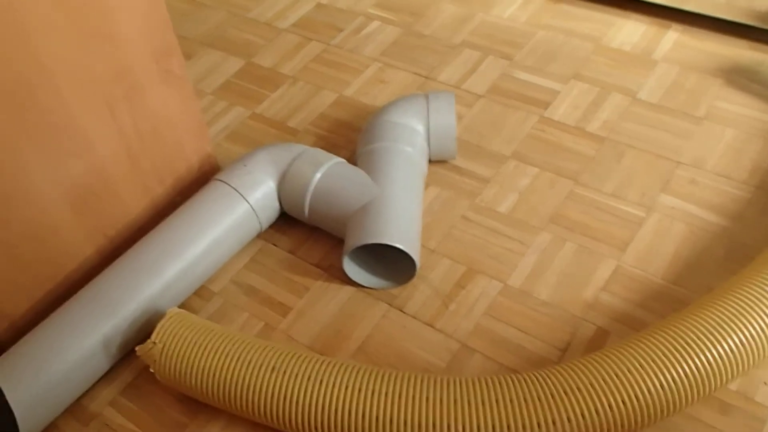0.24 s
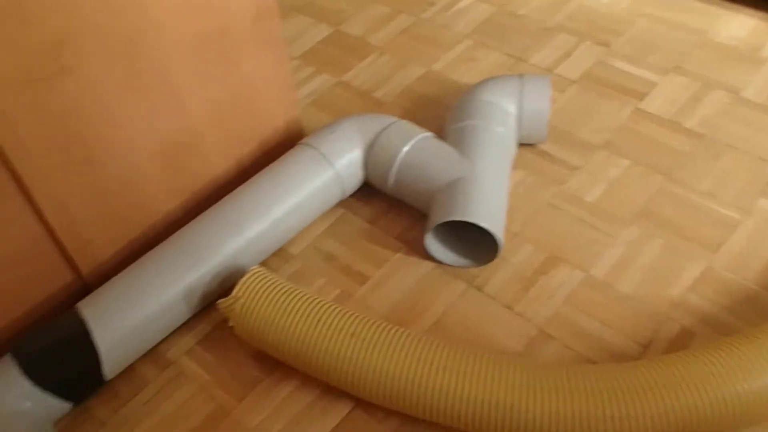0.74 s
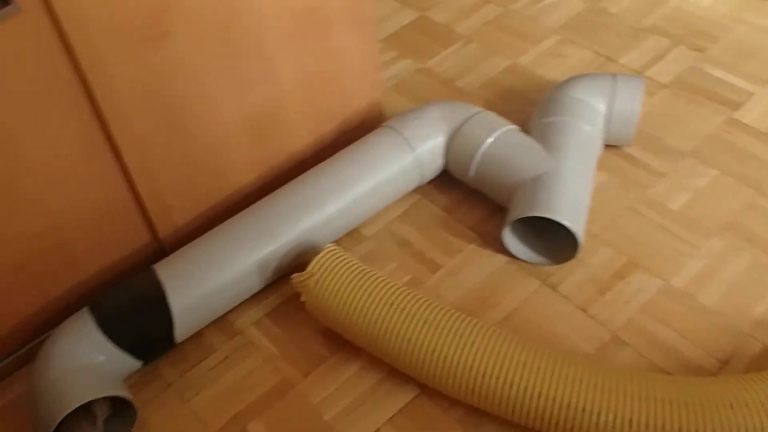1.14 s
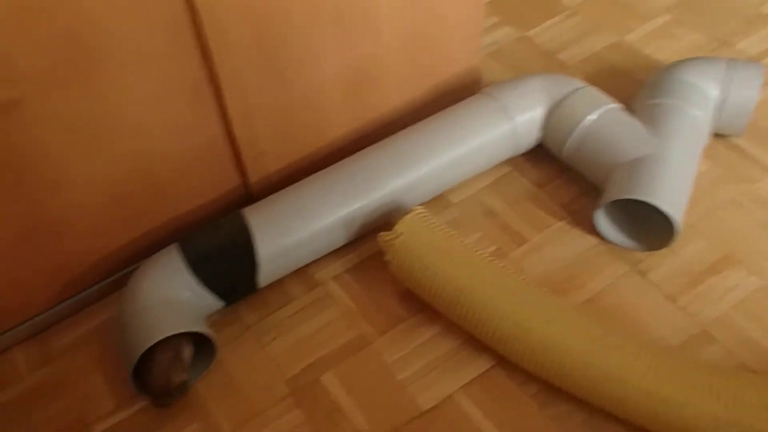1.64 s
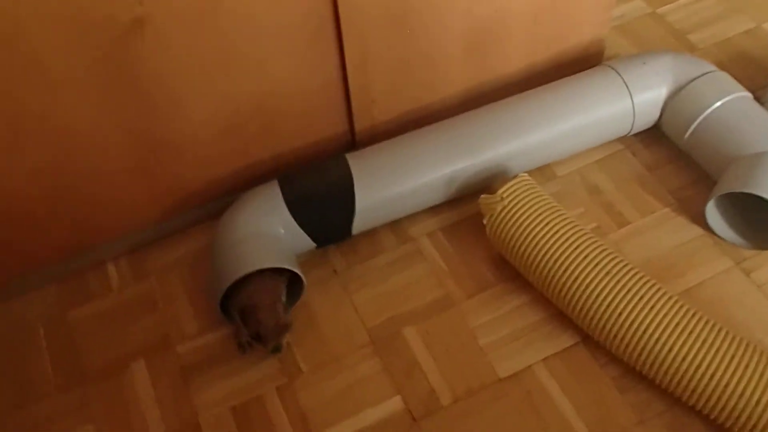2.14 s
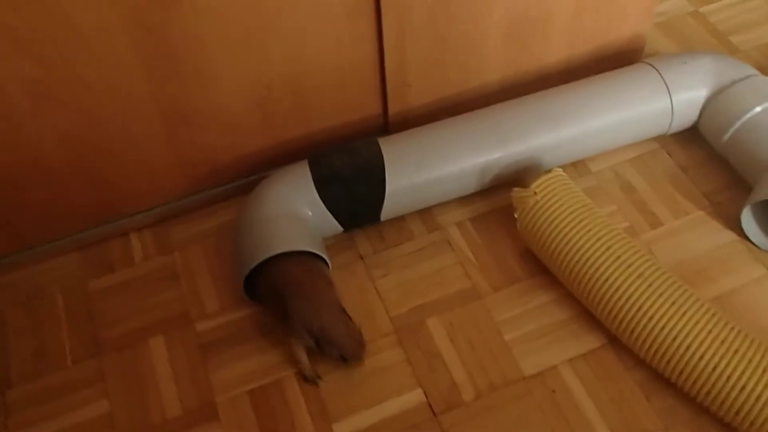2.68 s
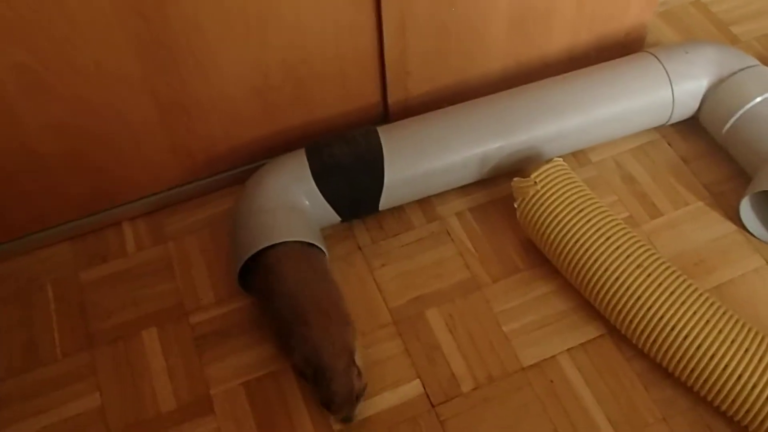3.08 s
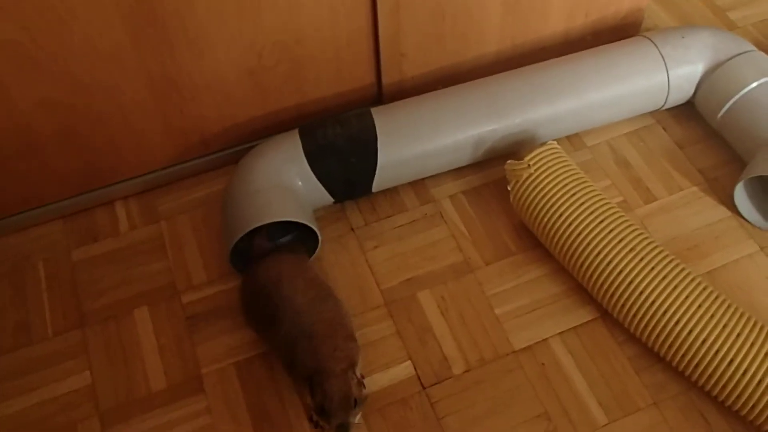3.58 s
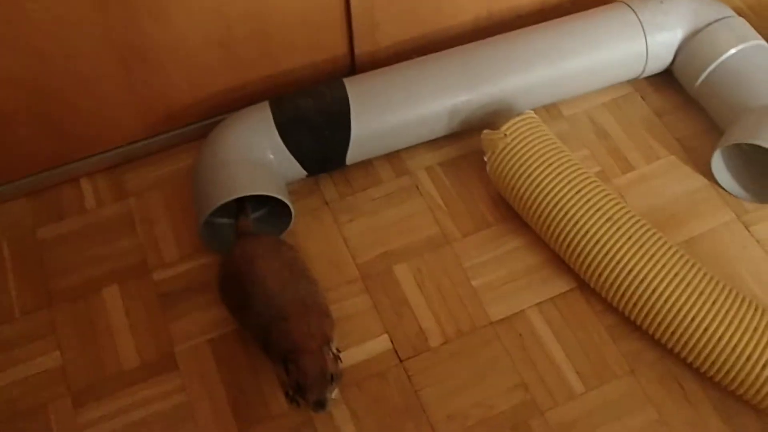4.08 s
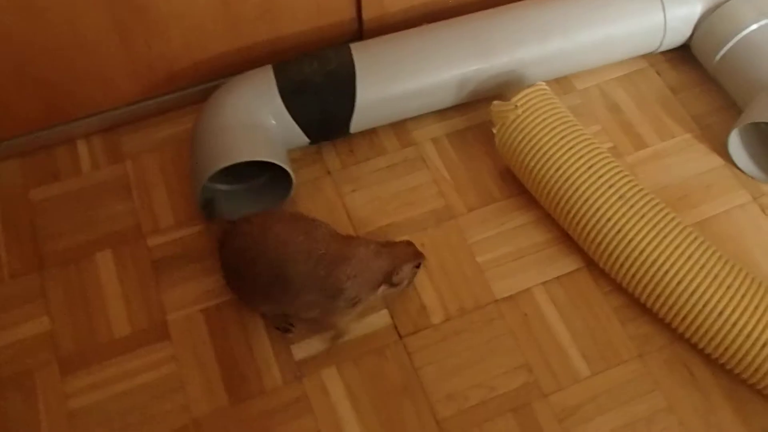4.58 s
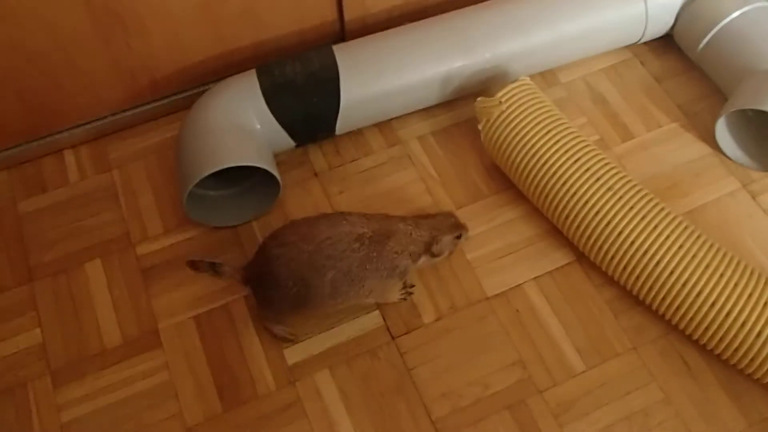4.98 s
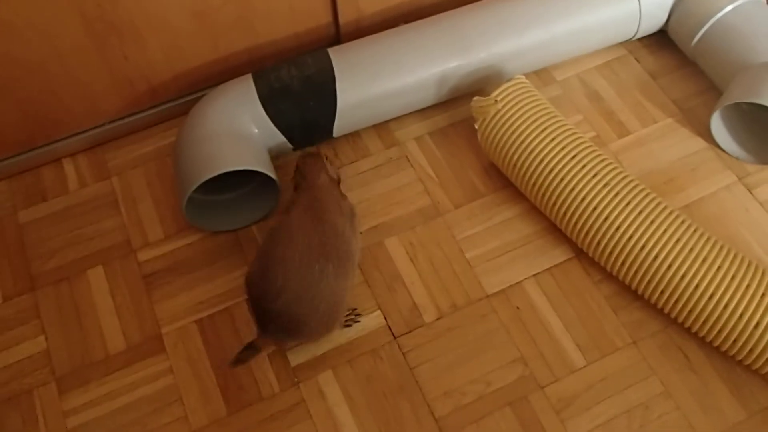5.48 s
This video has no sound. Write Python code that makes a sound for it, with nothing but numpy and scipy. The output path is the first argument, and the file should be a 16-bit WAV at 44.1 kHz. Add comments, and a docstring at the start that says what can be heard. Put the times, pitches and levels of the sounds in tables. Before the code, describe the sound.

Close, quick claw scratching rings thin and high in a plastic pipe for half a second, then breaks into sparse clicks and light scrapes. Sharper claw snaps come around three and four seconds, followed by a loud, short wooden knock before five. A quiet small room, handheld microphone with steady hiss, faint hum and soft handling bumps.

```python
"""On a parquet floor in a quiet room, a small rodent creeps out of a plastic drain pipe near a hand-held camera.
Its claws drag (dense runs of tiny slips) and click (short noise bursts), ringing plastic and wood.
A soft and later a loud knock on the floor combine a short pop with dying tones.
The hand rumbles, rubs and bumps the camera body; the electronics hiss, hum, pip and tick with every picture.
"""
import sys
import numpy as np
from scipy import signal
from scipy.fft import rfft, irfft, next_fast_len
from scipy.io import wavfile

SR = 44100
rng = np.random.default_rng(int(sys.argv[2]) if len(sys.argv) > 2 else 0)


def waveform_to_disk(signal):
    """Save audio, clipped to [-1, 1], as 16-bit WAV at the path in sys.argv[1]."""
    frames = np.transpose(np.atleast_2d(signal))
    scaled = np.clip(frames, -1, 1) * 32767
    samples = np.round(scaled).astype(np.int16)
    wavfile.write(sys.argv[1], SR, samples)


N = 252252   # length of the scene in samples

# claw strokes, each swelling and dying away:
# (peak time [s], rise [s], fall [s], pipe ring level [dB],
#  then relative to the pipe ring: pipe wall [dB], claw tips [dB], boards [dB], board thud [dB])
CLAW_STROKES = [(0.002, 0.018, 0.052, -40.5, -5.5, -8.5, -8, -19),
                (0.12, 0.077, .1, -42.5, -13, -26, -7, -15),
                (0.158, 0.057, 0.039, -38.5, -4, -11, -12, -28),
                (0.206, .03, 0.033, -42.5, -9, -17, -12, -20), (0.33, 0.35, .1, -53.5, -4, -9, -5.5, -11),
                (0.385, 0.036, 0.095, -40, -3.5, -13, -8, -13),
                (0.462, 0.044, 0.074, -47, -8, -14, -3.5, -11), (0.534, .03, 0.51, -59.5, -0.5, -7, -3, -7),
                (0.767, 0.015, .05, -55.5, -11, -22, -6, 2.5), (0.821, 0.082, 0.12, -45, -2, -7.5, -2, -10),
                (1.03, .05, .2, -62.5, 1, -2, -9, -4), (1.14, 0.17, 0.11, -56, -2, -12, 0, -6),
                (1.175, 0.012, 0.1, -46.5, 2, -3, -2, -18), (1.277, 0.051, .03, -50, -1, -5, -9, -4),
                (1.295, .02, .25, -60.5, 0, -4, -6, -12), (1.784, .09, .09, -57.5, -3, -2, -8, -10),
                (1.9, .1, .1, -62, 3, -14, -1, -9), (1.942, 0.093, 0.059, -48.5, -0.5, -20, 4, -4.5),
                (1.979, 0.047, 0.092, -47, -5, -21, -2.5, -1), (2.052, .01, 0.091, -57, 7.5, 7, -6, -8),
                (2.17, 0.016, 0.098, -62, 1, -10, 2, -5), (2.266, .1, 0.17, -58.5, 3, -3, -0.5, -1.5),
                (2.584, 0.23, .07, -67, -5, -4, 1, -6), (2.652, 0.042, 0.14, -57.5, 3.5, -8, 0, -14),
                (3.03, 0.029, .04, -63.5, -16, -13, 1, 8.5), (3.116, 0.076, 0.025, -51, 5, -4, 2, -9),
                (3.135, 0.0073, .025, -44.5, 0, 3, -5, -10), (3.154, .02, 0.11, -56, 3, 9.5, -2, -5),
                (3.436, .03, .16, -58.5, -15, -2, -6, -9), (3.562, 0.031, .08, -53.5, -12, -15, -7, -12),
                (3.6, 0.048, 0.17, -60, 6.5, 2, -3, -9), (3.733, 0.041, 0.16, -45, 0.5, 3.5, -5, -17),
                (3.901, 0.013, 0.15, -36.5, 1, 6.5, -2.5, -15.5),
                (3.934, 0.037, .1, -36, -6, 1.5, -17, -15), (4.02, 0.057, 0.42, -57, -6, -3, -9, -8),
                (4.128, .035, 0.083, -57, -7, -2, -6, -15), (4.153, .006, 0.17, -58.5, 6, 13.5, 0.5, -4.5),
                (4.312, 0.074, 0.18, -53, 0, -3.5, -6.5, -10), (4.44, 0.008, 0.051, -68, -2, 0, -4, 20),
                (4.486, .1, .12, -62.5, 0, -2, -7, -10), (4.56, 0.11, .12, -58, -11, -12, -6, -4),
                (4.65, 0.19, .1, -62, 1, 1, -10, -14), (4.723, 0.023, 0.15, -51.5, 5, 1.5, -3.5, -7),
                (4.899, .04, 0.08, -56.5, -2, -6, -9, -20), (4.935, .04, 0.19, -66.5, 8, 2, 3, -8),
                (5.27, .05, .1, -63, -5, 2, -12, -6), (5.314, 0.028, 0.056, -55.5, 7.5, -3, 0, -13),
                (5.517, 0.0079, .15, -56.5, -2, -3, -5.5, -6)]
# claw clicks: (time [s], pipe ring level [dB],
#  then relative to the pipe ring: pipe wall [dB], claw tips [dB], boards [dB])
CLAW_CLICKS = [(0.1, -38, -8, -16, -12), (0.2059, -38, -15, -19, -18), (0.268, -37, -1, -17, -6),
               (0.3708, -35, -2, -7, -9), (0.4322, -39, -2, -3, -8), (0.7653, -37.5, -6, -16, 1.5),
               (0.7846, -44, -5, -3, 3), (0.8274, -33, -5, -13, -9), (0.887, -44.5, 15, 7.5, -1),
               (1.0141, -50.5, -1, 8.5, -1), (1.049, -40.5, 2, -4, -8), (1.08, -48, 0, -6, -9),
               (1.102, -45, 1, -7, -7), (1.113, -50, 4, -6, -6), (1.121, -41, 0, -11, -6),
               (1.136, -50, 4, -6, -4), (1.1486, -47, 5, -4, -5), (1.175, -40, 8, -3, -17),
               (1.272, -32, 4, -12, -8), (1.3438, -43, -7, -8, -8), (1.7852, -40.5, 1, -7, -1.5),
               (1.8584, -49, -1, -4, 2), (1.882, -51, -3, -9, -3), (1.9013, -37, -6, -14, 2),
               (1.9364, -38, -2, -16, -5), (1.9735, -37, 2, -15, 5), (1.98, -43, 3, -15, -5),
               (1.991, -33.5, 1, -17, 1), (2.007, -36, 1, -15, -7), (2.0487, -42.5, 10, 11.5, -11),
               (2.172, -53, 7, 1, 8), (2.2002, -48, 15, 2, -13), (2.2706, -43.5, 5, -2, -3),
               (2.6477, -47.5, 6, -5, -1), (3.0205, -46, -11, -10, 5), (3.079, -41.5, 3, -6, -4),
               (3.129, -27.5, 1, 5, -4), (3.1307, -27, -4, 2, -6), (3.5149, -52, 5, 9, -1),
               (3.5608, -37.5, -11, -18, -12), (3.714, -36, -11, -3, -4), (3.891, -34, -2, 7, 3),
               (3.8943, -25, -14, 7.5, -18), (4.15, -50, -6, 12, -6), (4.712, -46, -4, 2, 6),
               (4.9365, -50, 9, -1, -9), (5.309, -44.5, -3, 1, -2), (5.319, -50, 1, 2, -4)]
# five ringing bodies, one table each: (pitch [Hz], nominal width [Hz], relative level [dB])
PIPE_RING = [(3736, 41, 2.5), (3812, 46, 3.5), (3878, 61, 2), (4020, 65, 4), (4126, 51, 1), (4115, 31, 1.5),
             (4273, 276, -2.5)]
PIPE_WALL_RING = [(4677, 215, 4), (4990, 290, -0.5), (5590, 330, -1.5), (6100, 200, 3.5),
                  (6460, 1800, -4.5)]
CLAW_TIP_RING = [(6950, 200, -8), (7400, 80, -12), (8050, 200, -6), (9400, 150, 0), (10050, 250, -4),
                 (10600, 150, -1), (10950, 200, 0), (11500, 250, -5), (12050, 300, -4), (13300, 600, -12),
                 (14700, 900, -19)]
BOARD_RING = [(2450, 250, -7), (2890, 60, 2), (3150, 200, -6), (3480, 100, -2)]
BOARD_THUD_RING = [(980, 564, -0.67), (1620, 440, 1.3), (1970, 640, -0.97)]
# how long a stroke dies away in each of the five bodies: (share of the stroke's fall time)
FALL_SHARES = [0.87, 0.75, 0.64, 0.9, 1.17]
# strength of the hiss along the pitch range: (pitch [Hz], relative level [dB per Hz])
HISS_SHAPE = [(18, -37), (30, -7.5), (70, -7.5), (90, -24), (121, -2.5), (145, -8), (215, -7.5),
              (437, -6.5), (780, -5), (844, -5.5), (2290, -8.5), (3870, -15), (6210, -10.5), (14400, -10.5),
              (16000, -11)]
# short dull pips from the camera: (time [s], relative level [dB])
CAMERA_PIPS = [(0.175, -52), (0.311, -47), (0.445, -50), (0.578, -45), (0.661, -41), (4.982, -47),
               (5.116, -49), (5.25, -45.5), (5.316, -50), (5.384, -49), (5.512, -51), (5.648, -54)]
# bumps on the camera body:
# (time [s], relative thud level [dB], thud pitch [Hz], shell ring relative to that level [dB])
CAMERA_BUMPS = [(0.234, -43.5, 148, -3), (1.009, -56, 56.5, -6), (1.089, -49, 147, -12),
                (1.609, -40.5, 101, -12), (1.659, -52, 126, -4), (1.79, -59, 127, 9.5),
                (2.244, -45.5, 129, -6), (2.315, -42.5, 77, -14.5), (2.482, -48.5, 86.1, -10),
                (2.816, -53.5, 106, -15), (3.015, -64, 127, -16), (3.145, -60, 127, 1),
                (3.161, -42.5, 140, -7.5), (3.957, -51, 67.3, -11), (4.042, -51.5, 110, -15),
                (4.179, -63, 61.9, -16), (4.401, -50, 97, -13), (4.412, -42.5, 110, -11),
                (4.879, -57, 78.1, -7), (4.96, -57, 99.6, -11)]
# the holding hand: (time [s], rumble level [dB], relative shell rub level [dB])
HAND_GRIP = [(0.05, -65, -63), (0.37, -81, -81), (0.67, -74, -68), (1.05, -78, -92), (1.22, -73.5, -63),
             (1.62, -80, -75.5), (1.8, -62, -64), (2.04, -76, -64), (2.28, -68, -72), (2.63, -69, -72),
             (2.9, -79, -89), (3.18, -68, -68), (3.5, -78, -79), (4.11, -59, -72.5), (4.38, -65.5, -62),
             (4.75, -69.5, -75), (5.11, -70.5, -82), (5.72, -82, -82)]
# knocks on the floor: (time [s], level [dB])
FLOOR_KNOCKS = [(0.66, -42), (4.6779, -13.8)]
# tones of a knocked floor: (pitch [Hz], level relative to the pop [dB], time to fall 60 dB [s])
FLOOR_TONES = [(620, -30, 0.029), (790, -20, 0.031), (1008, -16, 0.032), (1126, -30.5, 0.14),
               (1230, -26, 0.04), (1860, -37, 0.33), (2000, -28, 0.1), (2290, -15.5, 0.025),
               (2830, -21, 0.015), (4040, -21.5, 0.026)]

# T60 means the time to fall by 60 dB
SLIPS_PER_S = 2500   # average number of claw slips
STROKE_SWELL_DB = 20   # level gained over the rise and lost over the fall
CLICK_T60_S = 0.017
SNAP_DB, SNAP_T60_S, SNAP_ABOVE_HZ = -6, 0.0056, 2400   # level is relative to the claw tips
ROOM_T60_S, ROOM_DB, WALL_CUT_HZ = 0.17, -17, 9000   # T60 of the low notes; highs die sooner
HISS_DB = -52.5
HUM_HZ, HUM_WIDTH_HZ, HUM_DB = 122.64, 3.3, -76   # width of each of two filters in a row
FRAMES_PER_S = 30
TICK_START_S, TICK_HZ, TICK_LENGTH_S, TICK_DB = 0.021, 5605, 0.0035, -56.5
PIP_HZ, PIP_T60_S = 765, 0.042
SHELL_HZ, SHELL_T60_S = 214.3, 0.17
THUD_CYCLES = 3.44   # cycles in which a bump's thud falls 60 dB
KNOCK_HZ, KNOCK_RISE_S = 1640, 0.00072
KNOCK_ECHO_S, KNOCK_ECHO_DB = 0.0033, -9


def from_db(db):
    """Turn a level in dB into a gain."""
    return 10 ** (np.asarray(db) / 20)


def rms_one(x):
    """Scale a sound to an average strength (rms) of 1."""
    return x / np.sqrt(np.mean(x ** 2) + 1e-20)


def in_time(rows):
    """Draw straight lines between the rows of a time table, one curve per column."""
    s, *columns = np.transpose(rows)
    return [np.interp(np.arange(N) / SR, s, column) for column in columns]


def drift(rate):
    """Random wandering with rms 1: noise smoothed by two equal low-pass steps at rate [Hz]."""
    r = np.exp(-2 * np.pi * rate / SR)
    noise = rng.standard_normal(N + SR)   # the extra second lets the filter settle
    return rms_one(signal.lfilter([1], [1, -2 * r, r * r], noise)[SR:])


def resonate(x, hz, width_hz):
    """Ring at one pitch, with a gain of about 1 at the top of the resonance."""
    r = np.exp(-np.pi * width_hz / SR)
    top = [(1 - r * r) / 2, 0, (r * r - 1) / 2]
    return signal.lfilter(top, [1, -2 * r * np.cos(2 * np.pi * hz / SR), r * r], x)


def body(x, peaks):
    """Ring a solid body: side-by-side resonances of alternating sign, keeping the rms of white noise."""
    unit = np.zeros(4096)
    unit[0] = 1
    response = np.zeros(4096)
    for k, (hz, width_hz, db) in enumerate(peaks):
        # two filters in a row give steep sides
        ring = resonate(resonate(unit, hz, 1.6 * width_hz), hz, 4.0 * width_hz)
        response += (-1) ** k * from_db(db) * ring
    return signal.fftconvolve(x, response / np.sqrt(np.sum(response ** 2)))[:N]


def add(out, s, piece):
    """Mix a piece in, starting at s seconds."""
    i = round(s * SR)
    out[i:i + len(piece)] += piece[:N - i]


def damped(hz, t60):
    """A dying sine that starts from height 1 and falls 60 dB in t60 seconds."""
    t = np.arange(int(t60 * SR)) / SR
    return np.sin(2 * np.pi * hz * t) * from_db(-60 * t / t60)


def claw_slips():
    """A claw drags by many uneven little slips, over a fine noise, with a fluttering level."""
    sizes = from_db(2.8 * np.minimum(rng.exponential(1, N), 5)) * rng.choice([-1, 1], N)
    slips = sizes * (rng.random(N) < SLIPS_PER_S / SR)
    slips = slips + 0.37 * rng.standard_normal(N)
    return rms_one(slips) * from_db(1.5 * drift(92))


def stroke_strength():
    """Each stroke swells and dies in each body; overlapping strokes add their power."""
    power = np.zeros((5, SR + N))   # one second of room before the start
    t = np.arange(-SR, SR) / SR
    for s, rise, fall, ring_db, *above_db in CLAW_STROKES:
        i = round(s * SR)
        for k, db in enumerate([0, *above_db]):
            rising = -t / max(rise, 0.003)
            falling = t / max(fall * FALL_SHARES[k], 0.003)
            lost_db = STROKE_SWELL_DB * np.maximum(rising, falling)
            power[k, i:i + 2 * SR] += from_db(2 * (ring_db + db - lost_db))[:SR + N - i]
    return np.sqrt(power[:, SR:])


def claws():
    """Slips and short click bursts drive the same plastic and wood; each click adds a bare claw snap."""
    bodies = [PIPE_RING, PIPE_WALL_RING, CLAW_TIP_RING, BOARD_RING, BOARD_THUD_RING]
    slips = claw_slips()
    push = stroke_strength() * slips
    snap = np.zeros(N)
    t = np.arange(SR // 10) / SR
    bursts = rng.standard_normal((len(CLAW_CLICKS), SR // 10))
    for (s, ring_db, *above_db), burst in zip(CLAW_CLICKS, bursts):
        fade = from_db(ring_db - 4.0 - 60 * t / CLICK_T60_S)
        for k, db in enumerate([0, *above_db]):
            add(push[k], s, fade * burst * from_db(db))
        tips_db = ring_db + above_db[1]
        snap_fade = from_db(tips_db + SNAP_DB - 60 * t / SNAP_T60_S)
        add(snap, s, burst[::-1] * snap_fade)   # reversed, so it differs from the click's noise
    snap = signal.sosfilt(signal.butter(2, SNAP_ABOVE_HZ, "high", fs=SR, output="sos"), snap)
    return snap + sum(body(force, peaks) for force, peaks in zip(push, bodies))


def room(x):
    """Sound goes round eight loops of different delay, weaker and duller on every round."""
    size = next_fast_len(N + SR)
    hz = np.arange(size // 2 + 1) * SR / size
    dull = 1 / (1 + (hz / WALL_CUT_HZ) ** 2)
    echoes = 0
    for k, lag in enumerate(rng.uniform(0.008, 0.03, 8)):   # delays in seconds
        delay = np.exp(-2j * np.pi * hz * lag)
        loop = from_db(-60 * lag / ROOM_T60_S) * dull ** (lag * 20) * delay
        echoes = echoes + (-1) ** k * loop / (1 - loop)   # the sum of all rounds
    return irfft(rfft(x, size) * echoes, size)[:N]


def preamp_hiss():
    """White noise is reshaped pitch by pitch into a steady amplifier hiss."""
    hz = np.maximum(np.arange(N // 2 + 1) * SR / N, 1)
    shape_hz, shape_db = np.array(HISS_SHAPE).T
    shape = np.interp(np.log(hz), np.log(shape_hz), shape_db)
    noise = rfft(rng.standard_normal(N))
    return from_db(HISS_DB) * rms_one(irfft(noise * from_db(shape), N))


def mains_hum():
    """Noise through two narrow resonances becomes a wavering low hum."""
    hum = resonate(rng.standard_normal(N), HUM_HZ, HUM_WIDTH_HZ)
    hum = resonate(hum, HUM_HZ, HUM_WIDTH_HZ)
    return from_db(HUM_DB) * rms_one(hum)


def picture_ticks():
    """Every picture gives a faint high tick: a sine under a bell-shaped swell, of uneven level."""
    out = np.zeros(N)
    t = np.arange(-SR // 100, SR // 100) / SR
    tick = np.sin(2 * np.pi * TICK_HZ * t) * np.exp(-(t / TICK_LENGTH_S) ** 2)
    times = np.arange(TICK_START_S - 0.01, N / SR, 1 / FRAMES_PER_S)   # the middle is 0.01 s later
    for s, db in zip(times, rng.normal(TICK_DB, 1.8, len(times))):
        add(out, s, from_db(db) * tick)
    return out


def pips():
    """Each short dull pip is a dying sine with a softened start."""
    out = np.zeros(N)
    pip = damped(PIP_HZ, PIP_T60_S)
    pip = pip * np.minimum(np.arange(len(pip)) / (0.0017 * SR), 1)   # fades in over 1.7 ms
    for s, db in CAMERA_PIPS:
        add(out, s, from_db(db + 1.0) * pip)
    return out


def camera():
    """The electronics add up: hiss, hum, ticks and pips."""
    return preamp_hiss() + mains_hum() + picture_ticks() + pips()


def hand():
    """Bumps give a short thud and ring the camera shell; the grip rumbles and rubs the same shell."""
    bumps = np.zeros(N)
    for s, db, hz, shell_db in CAMERA_BUMPS:
        thud = damped(hz, THUD_CYCLES / hz)[SR // 2000:]   # skipping 0.5 ms gives a harder start
        add(bumps, s, -from_db(db + 7.5) * thud)
        add(bumps, s, from_db(db + shell_db + 5.0) * damped(SHELL_HZ, SHELL_T60_S))
    bumps = signal.sosfilt(signal.butter(2, [45, 900], "band", fs=SR, output="sos"), bumps)
    rumble_db, rub_db = in_time(HAND_GRIP)
    low_band = signal.butter(2, [40, 110], "band", fs=SR, output="sos")
    rumble = signal.sosfilt(low_band, rng.standard_normal(N))
    rub = resonate(rng.standard_normal(N), SHELL_HZ, width_hz=28)
    rub = from_db(rub_db - 2.5 + 4.9 * drift(19)) * rms_one(rub)
    rumble = from_db(rumble_db + 2.7 * drift(3.7)) * rms_one(rumble)
    return bumps + rub + rumble


def knocks():
    """The board gives with a short pop and rings in its own tones; the cupboard throws it back."""
    out = np.zeros(N)
    t = np.arange(SR // 4) / SR - 2 * KNOCK_RISE_S
    knock = -np.cos(2 * np.pi * KNOCK_HZ * t) * np.exp(-(t / KNOCK_RISE_S) ** 2)
    for hz, db, t60 in FLOOR_TONES:
        add(knock, KNOCK_RISE_S, from_db(db) * damped(hz, t60)[:SR // 5])
    for s, db in FLOOR_KNOCKS:
        add(out, s, from_db(db) * knock)
        add(out, s + KNOCK_ECHO_S, from_db(db + KNOCK_ECHO_DB) * knock)
    # a light paw moves no bass
    return signal.sosfilt(signal.butter(2, 420, "high", fs=SR, output="sos"), out)


def scene():
    """One microphone feeds both channels; only the claws get room echo."""
    animal = claws()
    mono = animal + from_db(ROOM_DB) * room(animal) + camera() + hand() + knocks()
    return np.array([mono, mono])


def record(dry):
    """Cut the top steeply: 60 dB down from 16250 Hz upward."""
    return signal.sosfilt(signal.cheby2(16, 60, 16250, fs=SR, output="sos"), dry)


dry = scene()
out = record(dry)
waveform_to_disk(out)
```